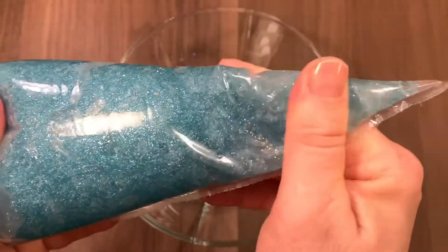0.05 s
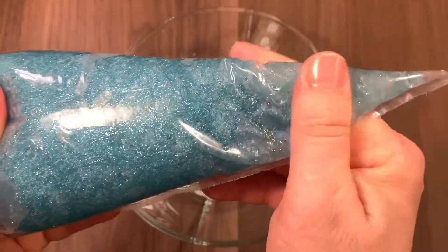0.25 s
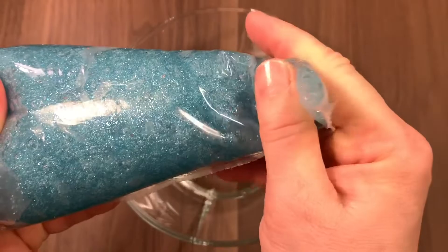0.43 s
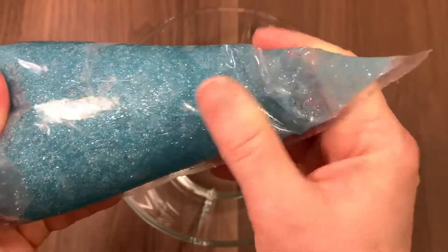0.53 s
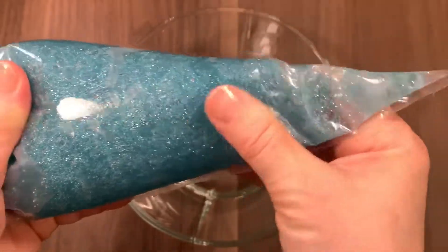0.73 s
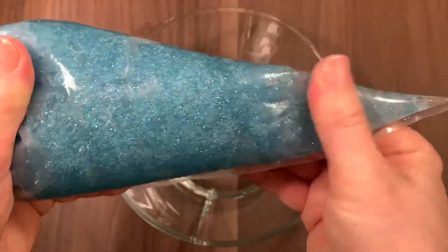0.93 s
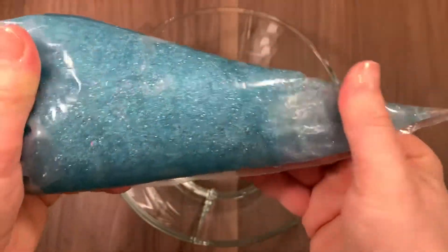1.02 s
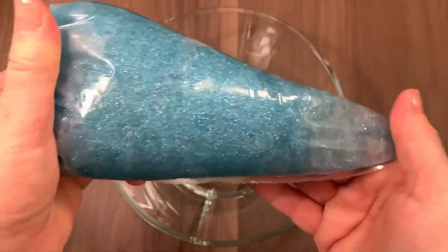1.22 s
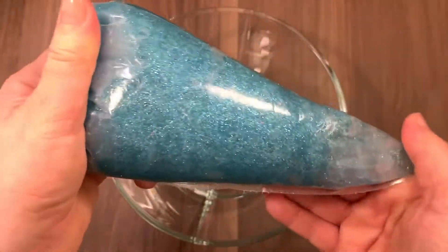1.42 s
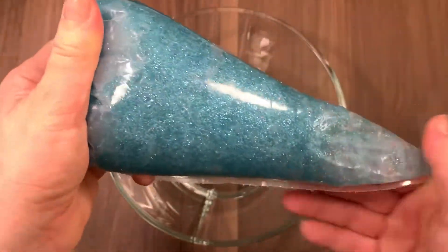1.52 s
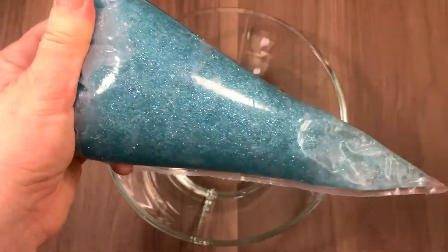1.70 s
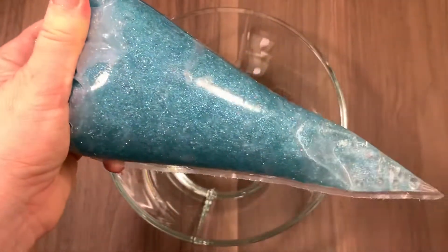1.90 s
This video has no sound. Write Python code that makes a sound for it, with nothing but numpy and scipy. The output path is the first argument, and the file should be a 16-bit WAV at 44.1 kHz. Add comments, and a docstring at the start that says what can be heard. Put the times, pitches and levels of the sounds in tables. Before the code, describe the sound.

A filled plastic piping bag crinkles in the hands, with small sharp snaps.

```python
"""Handling a filled piping bag

Fingers press and shift a thin plastic bag close to a stereo microphone in a quiet room. Creases buckle
in sharp snaps that flutter through the film for a few milliseconds, and tiny wrinkles crackle as the
grip moves. Skin brushes the plastic, and contacts excite the bag's hollow modes. The room reverberates
over a low hum, one tone of which swells briefly; near the end the level dips for a moment."""
import sys
import numpy as np
from scipy import signal
from scipy.fft import rfft, irfft
from scipy.io import wavfile

SR = 44100
rng = np.random.default_rng(int(sys.argv[2]) if len(sys.argv) > 2 else 0)


def dump(signal):
    """Clip the signal to [-1, 1] and save it as 16-bit WAV at the path in sys.argv[1]."""
    limited = np.clip(np.atleast_2d(signal).T, -1, 1)
    pcm = np.round(limited * 32767).astype(np.int16)
    wavfile.write(sys.argv[1], SR, pcm)


N = 85995
LEAD_S = .1  # handling begins before time zero, so the room already rings


def undb(db):
    """Amplitude ratio of a level in decibels."""
    return 10 ** (np.asarray(db) / 20)


def unit(x):
    """Normalisation to an rms of 1."""
    return x / np.sqrt(np.mean(x ** 2))


def log_curve(size, hz, values):
    """Interpolation in log frequency onto the bins of a Fourier transform."""
    return np.interp(np.log(np.fft.rfftfreq(size, 1 / SR) + 1), np.log(hz), values)


def minimum_phase(hz, db, size=512):
    """Minimum-phase impulse response with the given gains, by folding the cepstrum."""
    cepstrum = irfft(log_curve(size, hz, np.log(undb(db))))
    cepstrum[1:size // 2] *= 2
    cepstrum[size // 2 + 1:] = 0
    return irfft(np.exp(rfft(cepstrum)))


def colour(x, spectrum):
    """Spectral shaping by convolution; rows are frequency_hz, gain_db."""
    impulse = minimum_phase(*np.array(spectrum).T, size=4096)
    return signal.fftconvolve(x, impulse[None], axes=1)[:, :x.shape[1]]


def add(out, start_s, sound):
    """Superposition of a mid and side pair from a given time."""
    first = max(int((start_s + LEAD_S) * SR), 0)
    part = out[:, first:first + sound.shape[1]]
    part += sound[:, :part.shape[1]]


# Spectrum of the room noise: frequency_hz, relative_density_db
NOISE_SPECTRUM = [(20, -10), (50, -2.5), (100, -0.5), (200, -6), (380, -6.5), (740, -13.5), (1500, -22),
                  (4300, -17.5), (8000, -29), (11000, -42), (16000, -32)]
# Tones of the hum: pitch_hz, level_db
HUM_TONES = [(79, -81), (97.5, -70.5), (290.7, -83), (344.5, -76.5), (393, -80), (640, -82)]

def background(noise_db=-66, waver_depth=0.55, wavers_per_s=7.61):
    """Random modulation: hum tones waver in amplitude and phase over steady, low room noise."""
    t = np.arange(N) / SR
    mid, side = unit(colour(rng.standard_normal((2, N)), NOISE_SPECTRUM)) * undb(noise_db)
    for hz, db in HUM_TONES:
        real, imaginary = rng.standard_normal((2, 64))
        waver = np.interp(t * wavers_per_s, np.arange(len(real)), real + 1j * imaginary)
        carrier = np.exp(2j * np.pi * (hz * t + rng.random()))
        mid = mid + undb(db) * unit(np.real((1 + waver_depth * waver) * carrier))
    return np.array([mid, side])


def decay(t, time_constant_s):
    """Exponential decay of unit energy."""
    return np.exp(-t / time_constant_s) * np.sqrt(2 / (time_constant_s * SR))


def buckle(crunch_db=0, flip_db=2, flip_s=0.00017, flutter_db=6, flutter_s=0.0035, cutoff_hz=9340):
    """Snap-through buckling: a tick, the crease flipping, then duller flutter through the film."""
    size = 640
    t = np.arange(size) / SR
    flip, flutter = rng.standard_normal((2, 2, size))
    flip = undb(flip_db) * flip * decay(t, flip_s)
    flutter = signal.lfilter(*signal.butter(1, cutoff_hz, fs=SR), flutter)
    flutter = undb(flutter_db + crunch_db) * flutter * decay(t, flutter_s)
    tick = np.eye(2, size)
    tick[1] = (np.roll(tick[0], 2) - tick[0]) * np.sqrt(.5)  # a doublet in the side channel
    mid, side = tick + flip + flutter
    mid = np.pad(mid, (1, 0))[:size]  # centres the mid impulse on the doublet
    return np.array([unit(mid), unit(side)]) / np.sqrt(size)  # unit energy in each


# Crackle strength as the grip moves: time_s, level_db
GRIP_LEVELS = [(0, -66), (.17, -70), (.22, -59), (.27, -46), (.34, -53.5), (.44, -60), (.5, -91),
               (.6, -64.5), (.66, -46.5), (.78, -54), (.89, -48.5), (.98, -83), (1.04, -58), (1.12, -56),
               (1.23, -68), (1.35, -58), (1.42, -65.5), (1.48, -52.5), (1.56, -78.5), (1.86, -78),
               (1.95, -80)]
# Spectrum of the wrinkling film: frequency_hz, gain_db
FILM_SPECTRUM = [(150, -14), (500, -12), (1200, -11), (2500, -0.5), (4300, 0.5), (7000, -4), (8600, 1.5),
                 (12000, -20), (16000, -19)]

def wrinkles(size, rate_per_s=520, spread_db=3.5, ceiling_db=15, shapes=12):
    """Shot noise: tiny buckles occur at random times, as strongly as the grip is moving."""
    t = np.arange(size) / SR - LEAD_S
    crackle = np.zeros((2, size))
    for _ in range(shapes):
        onsets = rng.random(size) < rate_per_s / shapes / SR
        clicks = onsets * undb(np.minimum(spread_db * rng.exponential(size=size), ceiling_db))
        crackle += signal.fftconvolve(clicks[None], buckle(), axes=1)[:, :size]
    grip = undb(np.interp(t, *np.array(GRIP_LEVELS).T))
    crumple = undb(-33) * np.exp(-((t + 0.0403) / 0.0069) ** 2)  # before zero: heard as reverberation
    return unit(colour(crackle, FILM_SPECTRUM)) * (grip + crumple)


# Strokes of skin over the film: centre_s, half_width_s, level_db
SKIN_STROKES = [(.01, 0.059, -55), (0.431, 0.015, -49), (1.003, 0.044, -56), (1.494, 0.039, -53.5),
                (1.928, 0.037, -60.5)]
# Spectrum of the friction: frequency_hz, gain_db
FRICTION_SPECTRUM = [(300, -32), (1500, -6.5), (4200, -3), (8500, -3.5), (11000, -7.5), (15000, -6.5)]

def slides(size):
    """Sliding friction: skin brushes the film, giving broadband noise in short swells."""
    t = np.arange(size) / SR - LEAD_S
    swell = sum(undb(db) * np.exp(-((t - centre) / half) ** 2) for centre, half, db in SKIN_STROKES)
    return unit(colour(rng.standard_normal((2, size)), FRICTION_SPECTRUM)) * swell


# Limits of the five bands of a snap: edge_hz
BAND_EDGES_HZ = [300, 1200, 3000, 6500, 10000, 16000]
# Creases that buckle: start_s, resonance_hz, then relative_level_db in each band, low to high
CREASE_SNAPS = [(0.193, 4750, -68, -62.5, -55, -56, -55), (0.2277, 6000, -68, -48.5, -30.5, -43.5, -38.5),
                (0.244, 3330, -56.5, -43.5, -33.5, -39.5, -53), (0.2799, 2270, -55, -37, -35, -38.5, -39.5),
                (0.2963, 8300, -63, -48, -60, -69, -55), (0.3195, 4650, -64, -46, -20, -27, -26.5),
                (0.547, 6900, -103, -58.5, -46, -53.5, -51.5),
                (0.6205, 3170, -98, -34.5, -35.5, -35, -30.5), (0.6348, 3060, -66, -54, -42, -66, -58),
                (0.6854, 3670, -69, -39, -44, -50, -40), (0.7024, 1630, -76, -44, -40.5, -45, -58),
                (0.711, 8200, -90, -43, -36.5, -38.5, -42.5), (0.717, 7850, -76, -39.5, -35.5, -40, -47),
                (0.746, 4600, -83, -50, -42.5, -43, -41), (0.753, 5570, -60.5, -46, -41.5, -45.5, -54),
                (0.796, 8600, -64, -36.5, -29.5, -32, -25.5), (0.8107, 3060, -67, -39.5, -33, -46, -47),
                (0.8145, 2850, -67, -36.5, -31.5, -52, -35), (0.8459, 9300, -94, -35, -43.5, -39, -35),
                (0.8829, 3280, -53.5, -34.5, -28, -79, -36.5), (0.888, 1260, -46, -45, -52, -36.5, -34),
                (0.8961, 3430, -60, -34.5, -42.5, -41.5, -42.5),
                (0.9578, 4100, -57, -44.5, -40.5, -38, -45),
                (1.0028, 9400, -54.5, -40.5, -37, -35.5, -37.5), (1.0217, 4500, -54, -41, -32, -24.5, -37),
                (1.026, 3660, -49, -33.5, -29, -32.5, -38), (1.0353, 4040, -71, -38.5, -35, -32, -34),
                (1.0381, 3900, -59, -39, -35, -38, -39), (1.0422, 6500, -100, -43, -38, -36, -37),
                (1.097, 6230, -57, -39, -40, -32.5, -31.5), (1.2755, 1620, -58, -50, -41.5, -46, -62.5),
                (1.316, 6360, -69, -52, -36.5, -37, -48), (1.415, 2740, -86, -60, -56.5, -51, -49),
                (1.436, 2120, -94, -51, -56, -59, -51), (1.4761, 3360, -77, -48.5, -55, -56, -80),
                (1.565, 3350, -77, -55.5, -58, -82, -86), (1.6193, 1700, -79, -65, -69, -96, -84),
                (1.656, 2400, -74.5, -64.5, -59, -90, -86), (1.684, 4750, -89, -61, -59.5, -62, -90),
                (1.773, 7250, -99, -55, -52, -54, -67)]
SNAP_GAIN_DB, SNAP_SPAN_S = -3, 0.0034  # band energy is band power times this span
BASS_DB_PER_OCTAVE = -7  # below the lowest edge
CREAK_DB, CREAK_RISE_S = -11.5, 0.0011
RESONANCE_DB, RESONANCE_WIDTH_HZ = 8.5, 450
HARD_SNAP_DB, DB_PER_DOUBLING = -32, 5  # harder snaps have a wider, weaker resonance
CRUNCH_PER_DB, TILT_LIMIT_DB = 0.2546, 22.5

def snaps(size):
    """Elastic instability: loaded creases creak, buckle and beam their resonance at the microphone."""
    direct, into_room = np.zeros((2, 2, size))
    edges = np.array(BAND_EDGES_HZ)
    centres = np.sqrt(edges[1:] * edges[:-1])
    density_db = 10 * np.log10(SNAP_SPAN_S * SR * SR / 2 / np.diff(edges))
    hz = np.fft.rfftfreq(512, 1 / SR)[1:]
    before_s = np.arange(-220, 0) / SR
    loading = undb(CREAK_DB) * decay(-before_s, CREAK_RISE_S)  # grows until the crease gives way
    for start_s, resonance_hz, *bands_db in CREASE_SNAPS:
        shape_db = np.interp(np.log(hz), np.log(centres), density_db + bands_db + SNAP_GAIN_DB)
        shape_db += BASS_DB_PER_OCTAVE * np.maximum(np.log2(edges[0] / hz), 0)
        widening = 2 ** (max(max(bands_db) - HARD_SNAP_DB, 0) / DB_PER_DOUBLING)
        detuning = 2 * (hz - resonance_hz) / (RESONANCE_WIDTH_HZ * widening)
        peak_db = 10 * np.log10(1 + undb(RESONANCE_DB) ** 2 / widening / (1 + detuning ** 2))
        # Dull snaps creak and flutter more; bright ones are one clean crack.
        crunch_db = CRUNCH_PER_DB * np.clip(bands_db[1] - bands_db[-1], -TILT_LIMIT_DB, TILT_LIMIT_DB)
        creak = undb(crunch_db) * loading * rng.standard_normal((2, len(before_s)))
        excitation = np.hstack([creak, buckle(crunch_db)])
        for path, gain_db in (direct, shape_db + peak_db), (into_room, shape_db):
            snap = signal.fftconvolve(excitation, minimum_phase(hz, gain_db)[None], axes=1)
            add(path, start_s + before_s[0], snap)
    return direct, into_room


# Hollow modes of the filled bag: pitch_hz, gain_db, t60_s
HOLLOW_MODES = [(245, -20, 0.03), (283, -8, 0.094), (395, -2.5, 0.054), (844.6, -3.5, 0.13),
                (1100, -4, 0.055)]
# Fingers landing on the filling: start_s, strength_db, favoured_hz
FINGER_CONTACTS = [(0.278, -45.5, 950), (0.8856, -35.5, 318), (1.023, -47, 960)]

def knocks(size, push_s=0.0021, loss_at_octave_db=15):
    """Modal excitation: each soft contact favours the bag's modes near its own frequency."""
    out = np.zeros((2, size))
    t = np.arange(SR // 2) / SR
    attack = 1 - np.exp(-(t / push_s) ** 2)
    for start_s, strength_db, favoured_hz in FINGER_CONTACTS:
        ring = 0
        for hz, db, t60 in HOLLOW_MODES:
            gain = undb(strength_db + db - loss_at_octave_db * np.log2(hz / favoured_hz) ** 2)
            ring += gain * np.exp(-np.log(1000) * t / t60) * np.sin(2 * np.pi * hz * t)
        add(out, start_s, np.outer([1, 0], ring * attack))
    return out


def hum_swell(centre_s=0.37, half_width_s=0.09, pitch_hz=172, level_db=-64.5):
    """Amplitude envelope: a low tone of the hum swells briefly and fades along a Gaussian curve."""
    t = np.arange(N) / SR
    swell = undb(level_db) * np.exp(-((t - centre_s) / half_width_s) ** 2)
    return np.outer([1, 0], swell * np.sin(2 * np.pi * pitch_hz * t))


# Reverberant field: frequency_hz, level_re_direct_db, t60_s
ROOM_BANDS = [(256, -23, 0.17), (700, -6, 0.32), (1470, -4, 0.33), (2850, -4.5, 0.36), (4600, -6, 0.57),
              (9000, -10, 0.49), (9600, -10, 0.19), (14500, -11.5, 0.45)]

def reverberation(x, delay_s=0.0046, build_s=0.0025):
    """Diffuse reverberation: reflections build quickly, then decay exponentially band by band."""
    t = np.arange(SR) / SR
    hz, db, t60 = np.array(ROOM_BANDS).T
    noise = rfft(rng.standard_normal((2, SR)))
    tail = 0
    for share, level_db, time_constant_s in zip(np.eye(len(hz)), db, t60 / np.log(1000)):
        band = irfft(noise * log_curve(SR, hz, share))
        tail += band * undb(level_db) * decay(t, time_constant_s)
    tail *= np.clip((t - delay_s) / build_s, 0, 1)
    return signal.fftconvolve(x, tail, axes=1)[:, :x.shape[1]]


# Likeness of the two microphone channels: frequency_hz, coherence (0 to 1), left_lead_rad
STEREO_COHERENCE = [(250, 0.86, 0), (503, 0.76, 0), (1280, 0.24, -1), (2822, 0.74, -3.5), (3500, 0.02, -8),
                    (4340, 0.41, -7), (6440, 0.15, -7), (6600, 1, -6.5), (8200, 0.18, -5.5),
                    (9760, 0.98, -4), (13100, 1, -1.5), (15200, 0.83, 2.5)]

def microphone_pair(x):
    """Sum and difference: mid and side become left and right, with the pair's coherence and phase."""
    hz, coherence, lead_rad = np.array(STEREO_COHERENCE).T
    size = x.shape[1]
    alike = np.clip(log_curve(size, hz, coherence), 0, 1)
    right_lag = np.exp(-1j * log_curve(size, hz, lead_rad))
    mid, side = rfft(x) * np.sqrt(np.array([1 + alike, 1 - alike]) / 2)
    return irfft(np.array([mid + side, (mid - side) * right_lag]), size)


def scene():
    """Superposition of direct sound, reverberation and background at the microphone."""
    size = N + int(LEAD_S * SR)
    direct, into_room = snaps(size)
    handling = wrinkles(size) + slides(size) + knocks(size)
    bag = direct + handling + reverberation(into_room + handling)
    return microphone_pair(bag[:, -N:] + background() + hum_swell())


DIP_S, DIP_HALF_WIDTH_S, DIP_DB = 1.895, 0.017, -19
TOP_HZ = 16100

def record(dry):
    """Attenuation: the level dips briefly near the end, and a steep low-pass cuts the top treble."""
    t = np.arange(N) / SR
    dip = undb(DIP_DB * np.exp(-((t - DIP_S) / DIP_HALF_WIDTH_S) ** 2))
    low_pass = signal.ellip(8, .2, 70, TOP_HZ, fs=SR, output="sos")
    return signal.sosfilt(low_pass, dry * dip)


dry = scene()
out = record(dry)
dump(out)
```